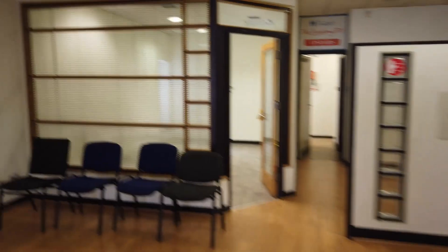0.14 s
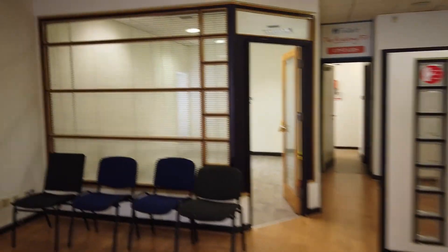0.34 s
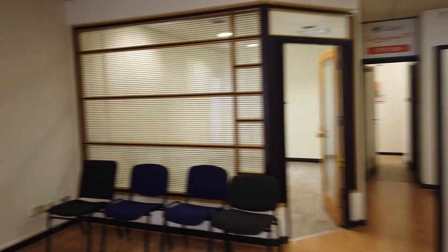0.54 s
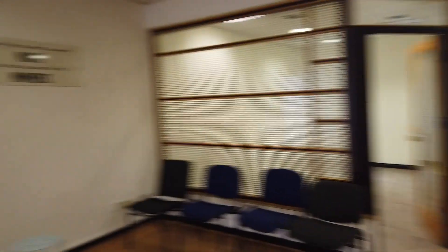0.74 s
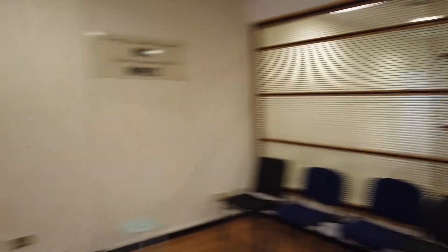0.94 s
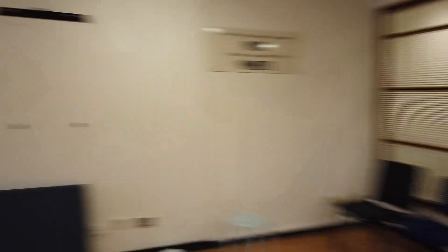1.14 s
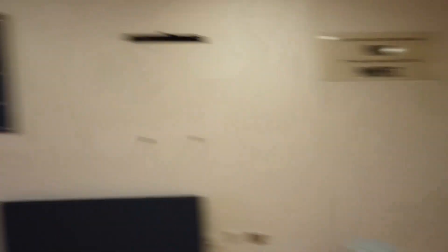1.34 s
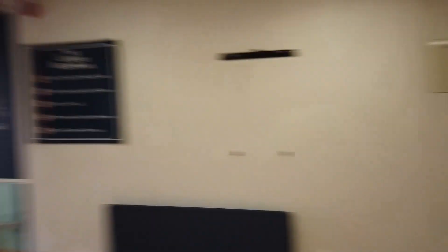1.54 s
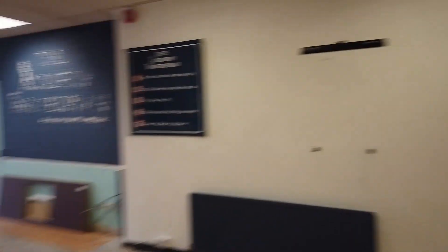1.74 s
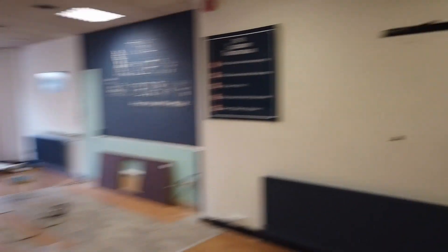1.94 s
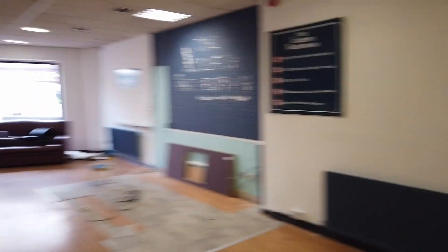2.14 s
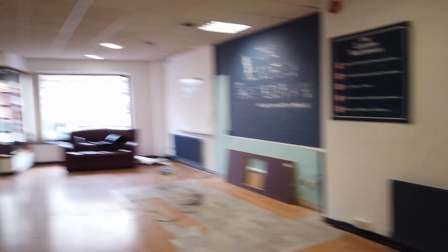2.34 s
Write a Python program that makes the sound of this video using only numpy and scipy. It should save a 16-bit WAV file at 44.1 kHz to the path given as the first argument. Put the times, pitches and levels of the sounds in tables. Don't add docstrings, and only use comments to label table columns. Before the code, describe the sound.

Someone walks across a wooden-sounding laminate floor in an empty, echoing room; three heel knocks about half a second apart fade to light contact and gritty ticks, over faint air hum and cloth rustle, heard from a handheld phone.

```python
import sys
import numpy as np
from scipy import signal
from scipy.fft import rfft, irfft
from scipy.io import wavfile
from scipy.ndimage import uniform_filter1d

SR = 44100
rng = np.random.default_rng(int(sys.argv[2]) if len(sys.argv) > 2 else 0)


def transcribe(u):
    v = np.clip(np.atleast_2d(u).T, -1, 1)
    q = np.round(v * 32767).astype(np.int16)
    wavfile.write(sys.argv[1], SR, q)


def voltage_ratio(decibels):
    exponent = np.asarray(decibels, float) / 20
    return 10 ** exponent


N = 110250

# [f/Hz, density level/dB]
AIR_SPECTRUM = [(25, -7), (60, -3), (200, -15), (500, -21.5), (1300, -23.5), (3300, -31.5), (7000, -38.5),
                (12000, -37.5), (15500, -44)]
# [f/Hz, level/dB]
AIR_SIDE_LEVEL = [(25, -10), (100, -15.5), (400, -13), (1500, -9), (5000, -1), (15000, -7.5)]
AIR_DB, FLUTTER_DB = -57.5, 5

# [t/s, rise/s, fall/s as 20 dB decay time, dull level/dB, bright level/dB]
SWISHES = [
    (-.3, 0.501, 0.095, -56, -69.5),
    (.4, .15, 0.33, -85, -76.5),
    (0.759, 0.038, 0.3, -71, -69.5),
    (.878, 0.012, 0.19, -73, -91),
    (.96, 0.15, .1, -78, -78),
    (1.31, 0.033, 0.18, -58.5, -59.5),
    (2.32, 0.12, 0.43, -83, -81),
    (1.4, 0.062, 0.3, -66.5, -87),
]
# [f/Hz, width/Hz, level/dB]
FABRIC_BANDS = [
    [(1940, 500, -3), (3180, 1400, 3.5), (4810, 1050, 0.5), (7400, 620, -15)],
    [(10860, 2200, 2), (7410, 2800, 0.5), (13200, 2900, -8.5)],
]

# [t/s, level/dB, board f/Hz, crack level/dB, room level/dB]
HEEL_BLOWS = [
    (-.12, -32, 700, -8, 1.5),
    (-.2, -26.5, 389, -28, 3.5),
    (0.2379, -8, 524, -10.5, 2.5),
    (.2859, -26.5, 620, 7, 1),
    (0.7712, -14.5, 444.4, -32.5, -1.5),
    (0.8734, -30.5, 556, -10.5, -12),
    (1.2930, -10.5, 474, -26, 1),
    (1.8107, -33.5, 541, -18, 3.5),
]
THUD_LEVELS = [-36, -46, -25.5, -33, -9, -5, -23, -9]
EDGE_LEVELS = [-8, -19, 0, -3.5, 1, 14, 9, 7]
# [f/Hz, level/dB, T60/s]
CRACK_MODES = [(880, 0.5, 0.0058), (1620, 0, 0.0014)]
# [f/Hz, level/dB, T60/s]
EDGE_MODES = [(2200, -1, 0.0027), (3000, -5.5, 0.0028), (4130, -13.5, 0.002)]
BOARD_T60_S, RISE_S = 0.018, 0.00061
KNOCK_LOW_SHARE = 0.26
BODY_HZ, BODY_DB, BODY_T60_S = 265, -21.5, 0.01
THUD_HZ, THUD_T60_S = 154.5, 0.043
TOUCH_S, TOUCH_DB = 0.011, -23
CRACK_SHADOW_DB = -27.5

# [f/Hz, level/dB, T60/s, side level/dB]
ROOM_DECAY = [(74.4, -21, 0.9, -30), (201, 6, 0.92, -37.5), (427, -14.5, 0.83, -14.5),
              (830, 4.5, 1.055, -16.5), (1850, 4, 1.276, -6), (3000, 9, 1.4, -1), (5000, 3.5, 0.61, -3),
              (10000, 9.5, 0.53, 20)]
# [f/Hz, level/dB, T60/s]
ROOM_MODES = [(204.2, -0.5, 0.33), (250, -9, 0.95), (379.5, -2.5, 0.73), (435.7, -6, 0.64),
              (503.6, 1, 0.37), (569.8, -3.5, 0.35), (639, -6.5, 0.76), (711, -5, 0.59), (778, -2.5, .9),
              (1005, -12, 1)]
ROOM_DB, ROOM_MODES_DB, FIRST_ECHO_S, SPARSE_S = -26.5, -20.5, 0.0051, 0.06

# [t/s, level/dB, f/Hz, T60/s]
SOLE_TICKS = [(0.2377, -29.5, 3000, 0.0017), (0.875, -48, 2580, 0.0064), (0.8751, -44, 970, 0.01),
              (1.2926, -51, 2800, 0.0022), (1.8103, -47.5, 2200, 0.0027), (1.808, -45, 1300, 0.0023),
              (0.658, -45.5, 2450, 0.0025), (1.8717, -41.5, 1980, 0.002), (1.9183, -33.5, 2800, 0.0029),
              (1.926, -41, 2500, 0.0023), (1.941, -34, 2200, 0.001), (1.945, -47, 3270, 0.0015),
              (2.041, -54.5, 2060, 0.0088)]
# [f/Hz, level/dB, T60/s]
SNAP_MODES = [(1410, -1.5, 0.0033), (2320, -2.5, 0.0024), (3680, 0.5, 0.0046)]
TICK_RISE_S, TICK_ROOM_DB = 0.00015, -24
SNAP_S, SNAP_DB = 1.2107, -27
SCUFF_S, SCUFF_LENGTH_S, SCUFF_HZ, SCUFF_DB = 0.878, 0.045, 3550, -64

# [t/s, level/dB, f/Hz, lead of the right port/s]
AIR_PUFFS = [
    (.755, -52, 29.7, 0.019),
    (2.382, -43, 49.6, 0.0045),
    (2.428, -40, 32.3, 0.011),
    (2.458, -47.5, 41.3, 0.0041),
]

PORT_LAG_S = 0.00009
PORT_HZ, PORT_WIDTH_HZ, PORT_DB = 10880, 930, 2.5
TOP_HZ = 15600
LR = np.array([[1], [-1]])


def curve(table, hz, col=1):
    table = np.array(table)
    return np.interp(np.log(hz), np.log(table[:, 0]), table[:, col])


def octave_share(f, hz):
    return np.cos(np.pi / 2 * np.clip(np.log2(f / hz), -1, 1)) ** 2


def band(x, hz, width):
    edges = [max(hz - width / 2, 10), min(hz + width / 2, 0.47 * SR)]
    sos = signal.butter(2, edges, "band", fs=SR, output="sos")
    return signal.sosfilt(sos, x)


def walk(rate):
    k = int(SR / rate)
    held = np.repeat(rng.standard_normal(N // k + 1), k)
    return 0.6 * uniform_filter1d(uniform_filter1d(held, k), k)[:N]


def ring(hz, t60, rise=0.00044):
    t = np.arange(4096) / SR
    return -np.sin(2 * np.pi * hz * t) * (1 - np.exp(-t / rise)) * voltage_ratio(-60 * t / t60)


def chord(modes, rise=0.00048):
    return sum((-1) ** k * voltage_ratio(db) * ring(hz, t60, rise) for k, (hz, db, t60) in enumerate(modes))


def add(out, x, s):
    i = int(round(s * SR))
    a = max(i, 0)
    b = max(min(i + x.shape[-1], N), a)
    if b > a:
        out[..., a:b] += x[..., a - i:b - i]


def place(out, x, s, lag=PORT_LAG_S):
    add(out[0], x, s + lag / 2)
    add(out[1], x, s - lag / 2)


def air():
    f, out = np.fft.rfftfreq(N, 1 / SR) + 1, 0
    mid, side = rfft(rng.standard_normal((2, N))) * voltage_ratio(curve(AIR_SPECTRUM, f)) * (f > 14)
    both = mid + LR * side * voltage_ratio(curve(AIR_SIDE_LEVEL, f))
    for hz in 15.6 * 2 ** np.arange(11):
        flutter_db = FLUTTER_DB * (0.13 + 200 / hz) ** 0.5 * walk(5.98)
        out = out + irfft(both * octave_share(f, hz), N) * voltage_ratio(flutter_db)
    return out * voltage_ratio(AIR_DB) / np.sqrt(np.mean(out ** 2))


def cloth():
    t, out = np.arange(N) / SR, 0
    shared, own = rng.standard_normal(N), rng.standard_normal(N)
    rub = shared + 0.58 * own * LR
    dull, bright = (sum(voltage_ratio(db) * band(rub, hz, width) * np.sqrt(SR / 2 / width) for hz, width, db in row)
                    for row in FABRIC_BANDS)
    for s, rise, fall, dull_db, bright_db in SWISHES:
        swell = np.clip((t - s) / rise, 0, 1)
        decay = voltage_ratio(-20 * np.clip(t - s - rise, 0, 9) / fall)
        out = out + swell * decay * (voltage_ratio(dull_db) * dull + voltage_ratio(bright_db) * bright)
    return out * voltage_ratio(0.51 * walk(49.15))


def echo():
    t = np.arange(2 ** 15 + 2 ** 14) / SR
    density = np.clip((t / SPARSE_S) ** 2 * 0.2 + 0.025, 0, 1)
    struck = rng.random(len(t)) < density
    hits = rng.standard_normal((2, len(t))) * struck / np.sqrt(density) * (t > FIRST_ECHO_S)
    f, spec, out = np.fft.rfftfreq(len(t), 1 / SR) + 1, rfft(hits), 0
    for hz in 62.5 * 2 ** np.arange(9):
        decay = voltage_ratio(curve(ROOM_DECAY, hz) - 60 * t / curve(ROOM_DECAY, hz, col=2))
        mid, side = irfft(spec * octave_share(f, hz), len(t)) * decay
        out = out + mid + LR * side * voltage_ratio(curve(ROOM_DECAY, hz, col=3))
    loudest_db, modes = max(m[1] for m in ROOM_MODES), 0
    for hz, db, t60 in ROOM_MODES:
        turn = rng.random()
        modes = modes + voltage_ratio(db - loudest_db - 60 * t / t60) * np.sin(2 * np.pi * (hz * t + turn))
    out = out + voltage_ratio(ROOM_MODES_DB) * modes * (t > FIRST_ECHO_S)
    return out * voltage_ratio(ROOM_DB) * (t > FIRST_ECHO_S / 2)


def wet(x):
    return signal.fftconvolve(echo(), x[None], axes=1)


def steps():
    out = np.zeros((2, N))
    for (s, db, hz, crack_db, room_db), thud_db, edge_db in zip(HEEL_BLOWS, THUD_LEVELS, EDGE_LEVELS):
        body_db = BODY_DB - 20 * (s < 0)
        board = ring(hz, BOARD_T60_S, RISE_S) + voltage_ratio(body_db) * ring(BODY_HZ, BODY_T60_S, RISE_S)
        high_pass = signal.butter(2, KNOCK_LOW_SHARE * hz, "high", fs=SR, output="sos")
        thud = voltage_ratio(thud_db) * ring(THUD_HZ, THUD_T60_S, 0.0069)
        knock = signal.sosfilt(high_pass, board) + thud
        crack = voltage_ratio(crack_db) * (chord(CRACK_MODES) + voltage_ratio(edge_db) * chord(EDGE_MODES))
        place(out, voltage_ratio(db + TOUCH_DB) * ring(hz, 0.06, 0.008), s - TOUCH_S)
        place(out, voltage_ratio(db + 7) * (knock + voltage_ratio(CRACK_SHADOW_DB) * crack), s)
        add(out, voltage_ratio(db + 0.5 + room_db) * wet(knock + crack), s)
    return out


def ticks():
    out, t = np.zeros((2, N)), np.arange(4096) / SR
    for s, db, hz, t60 in SOLE_TICKS:
        place(out, voltage_ratio(db + 11.5) * ring(hz, t60, TICK_RISE_S), s)
    place(out, voltage_ratio(SNAP_DB) * band(chord(SNAP_MODES, TICK_RISE_S), 2600, 3700), SNAP_S)
    pressure = np.sin(np.pi * np.clip(t / SCUFF_LENGTH_S, 0, 1)) ** 0.5
    slide = band(rng.standard_normal(len(t)), SCUFF_HZ, 400) * pressure
    place(out, voltage_ratio(SCUFF_DB + 25) * slide, SCUFF_S)
    return out + voltage_ratio(TICK_ROOM_DB) * wet(out[0])[:, :N]


def bumps():
    out = np.zeros((2, N))
    for s, db, hz, lag in AIR_PUFFS:
        place(out, voltage_ratio(db + 10.5) * ring(hz, 0.16, 0.0061), s, lag)
    return out


def scene():
    return air() + cloth() + steps() + ticks() + bumps()


def roll_off(x):
    return signal.sosfilt(signal.butter(12, 15650, fs=SR, output="sos"), x)


def record(dry):
    heard = dry + (voltage_ratio(PORT_DB) - 1) * band(dry, PORT_HZ, PORT_WIDTH_HZ)
    low_pass = signal.ellip(8, 0.2, 60, TOP_HZ, fs=SR, output="sos")
    return roll_off(signal.sosfilt(low_pass, heard))


dry = scene()
out = record(dry)
transcribe(out)
```